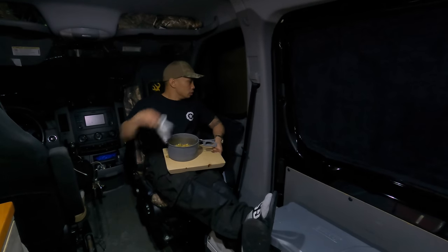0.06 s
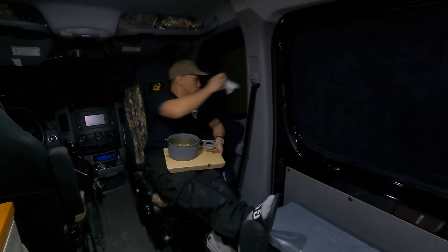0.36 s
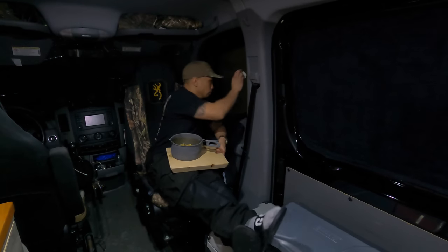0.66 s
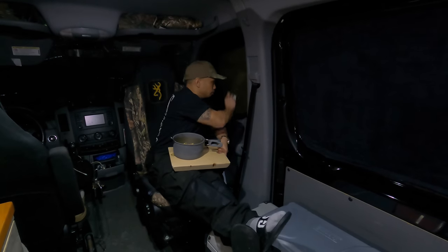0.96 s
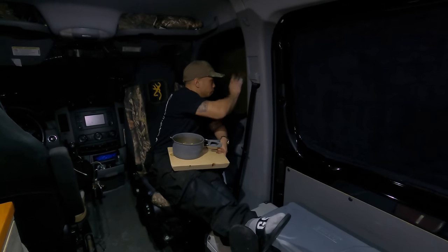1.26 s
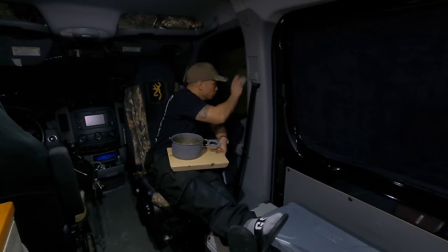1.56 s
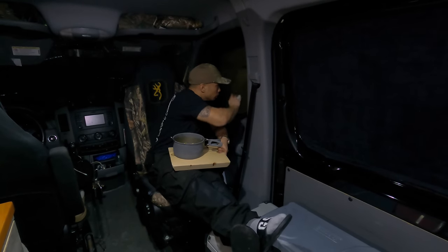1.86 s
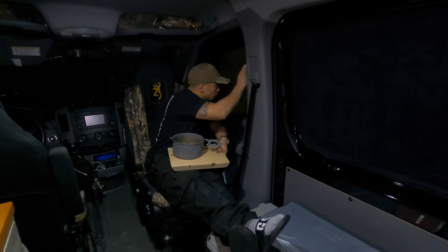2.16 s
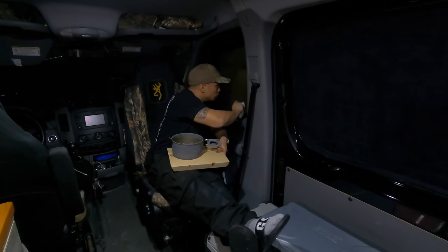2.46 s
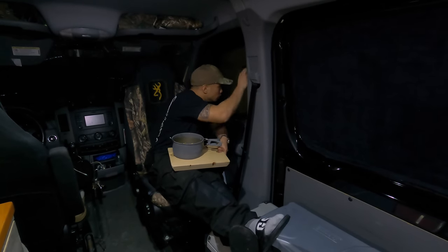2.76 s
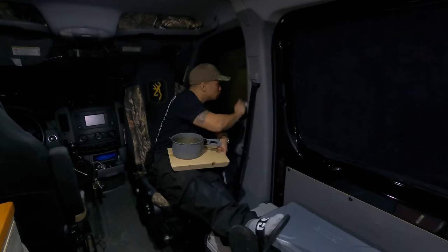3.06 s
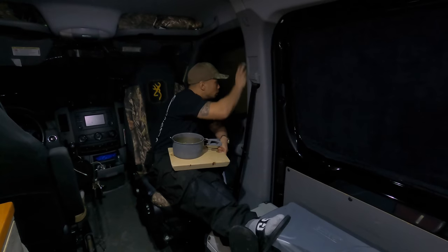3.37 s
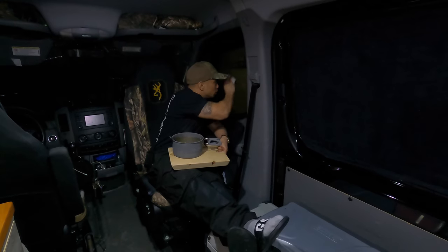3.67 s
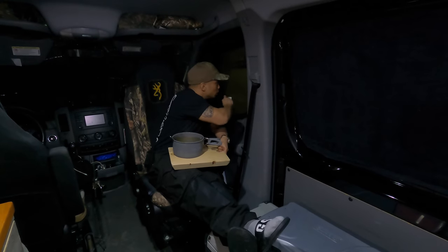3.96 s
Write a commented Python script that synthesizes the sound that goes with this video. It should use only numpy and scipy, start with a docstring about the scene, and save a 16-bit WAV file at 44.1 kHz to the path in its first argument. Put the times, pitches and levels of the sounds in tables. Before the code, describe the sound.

Quiet rubbing of a cloth on window glass follows a short rustle of clothing. The cloth squeaks now and then and the pane thuds lightly in its seal, heard a little way off in a van's low-rumbling cabin.

```python
"""A cloth wipes the side window of a parked van, heard from inside on a stereo pair of microphones.
Its fibres catch and let go in a swish across the pane; now and then it grips the glass and squeaks.
The hand bumps the window, which thuds and rattles in its seal, and rocks the door.
Clothes rustle first, as the arm reaches over, and a low rumble fills the cabin throughout."""
import sys
import numpy as np
from scipy import signal
from scipy.fft import rfft, irfft
from scipy.io import wavfile

SR = 44100
rng = np.random.default_rng(int(sys.argv[2]) if len(sys.argv) > 2 else 0)


def int16_out(signal):
    """Quantize to a 16-bit WAV file."""
    q = np.round(np.clip(np.atleast_2d(signal).T, -1, 1) * 32767)
    wavfile.write(sys.argv[1], SR, q.astype(np.int16))


N = 176400
T = np.arange(N) / SR
HZ = np.maximum(np.arange(N // 2 + 1) * SR / N, 1)
CUTOFF_HZ = 13100


def from_db(db):
    """Decibels to gain."""
    return 10 ** (np.asarray(db) / 20)


def rms_one(x):
    """Scale to rms 1."""
    return x / np.sqrt(np.mean(x ** 2) + 1e-20)


def gain_at(spectrum, hz):
    """Gain from a table of decibels, read on a log-frequency axis."""
    freqs, db = np.transpose(spectrum)
    return from_db(np.interp(np.log(hz), np.log(freqs), db))


def fader(points):
    """Gain over time from a level curve."""
    return from_db(np.interp(T, *np.transpose(points)))


def drift(width_hz, centre_hz=0):
    """Random wavering in a band of frequencies; rms 1."""
    white = rfft(rng.standard_normal(N))
    return rms_one(irfft(white / (1 + ((HZ - centre_hz) / width_hz) ** 2), N))


def swells(rows):
    """Gain over time of bell-shaped movements, each with its own rise and fall."""
    bells = [from_db(db) * np.exp(-((T - peak) / np.where(T < peak, rise, fall)) ** 2)
             for peak, rise, fall, db in rows]
    return np.linalg.norm(bells, axis=0)


def cabin(x, wet_db, t60):
    """Direct sound plus the short, dense reflections of the van's close walls."""
    t = T[:SR // 4]
    tails = rng.standard_normal((2, len(t))) * from_db(-60 * t / t60) * (t > .002)
    tails /= np.sqrt(np.sum(tails ** 2, axis=1, keepdims=True))
    return x + from_db(wet_db) * signal.fftconvolve(x[None], tails, axes=1)[:, :N]


# Base stereo width at the microphones. Each row: frequency in Hz, side minus mid in dB.
STEREO_WIDTH = [(30, -40), (120, -24), (250, -16), (900, -11.5), (2200, -5.5), (4200, -15.5), (7500, -35),
                (9500, -3.5)]
def coloured(source, spectrum, wider_db=0):
    """Two unrelated signals become one stereo sound with the given spectrum; rms 1."""
    low_cut = HZ ** 2 / (HZ ** 2 + 14 ** 2)
    mid, side = rfft(source) * gain_at(spectrum, HZ) * low_cut
    side *= gain_at(STEREO_WIDTH, HZ) * from_db(wider_db)
    return rms_one(irfft(mid + side * [[1], [-1]], N))


def friction(spectrum, flutter_db, flutter_hz):
    """Countless tiny slips of fibres over a smooth hiss, under uneven pressure."""
    slips_per_s, spread_db, slip_share = 5000, 1, .41
    sizes = from_db(spread_db * np.minimum(rng.exponential(1, (2, N)), 4))
    signs = rng.choice([-1, 1], (2, N))
    slips = rms_one(sizes * signs * (rng.random((2, N)) < slips_per_s / SR))
    hiss = rng.standard_normal((2, N))
    rubbing = np.sqrt(slip_share) * slips + np.sqrt(1 - slip_share) * hiss
    pressure = from_db(flutter_db * drift(flutter_hz))
    return coloured(rubbing * pressure, spectrum)


# Room tone, all around the microphones. Each row: frequency in Hz, relative density in dB.
RUMBLE_SPECTRUM = [(18, 4.5), (30, 7.5), (50, -6), (80, -5), (130, -13.5), (200, -17), (300, -28.5),
                   (800, -41), (2000, -47.5), (8000, -55), (14000, -86)]
# Cabin resonances, dead centre. Each row: frequency in Hz, half-width in Hz, level in dB.
CABIN_BOOMS = [(64.6, 4.4, -53), (105.96, 1.34, -62)]
def rumble():
    """Steady low rumble, booming at two resonances of the cabin."""
    bed = from_db(-52.5) * coloured(rng.standard_normal((2, N)), RUMBLE_SPECTRUM, wider_db=11.5)
    return bed + sum(from_db(db) * drift(width, centre_hz=hz) for hz, width, db in CABIN_BOOMS)


# The arm reaching across to the window. Each row: time in seconds, level in dB.
REACH_LEVELS = [(0, -52.5), (.08, -54), (.16, -55), (.22, -61), (.32, -56.5), (.44, -59), (.51, -54.5),
                (.58, -56), (.67, -53), (.79, -59.5), (.87, -66.5), (1.0, -116)]
# Body on seat, hand on pane. Each row: peak time, rise and fall in seconds, level in dB.
SCUFF_SWELLS = [(.388, 0.005, 0.033, -53.5), (.59, 0.075, 0.072, -60.5), (2.474, 0.028, 0.035, -58),
                (3.46, .035, 0.055, -59), (3.607, .005, 0.021, -54)]
# Tone of the rustle and of the scuffs. Each row: frequency in Hz, relative density in dB.
RUSTLE_SPECTRUM = [(230, -6.5), (480, -8.5), (700, -4), (1100, -0.5), (1500, -1.5), (1950, -9.5),
                   (2660, -11.5), (4100, -5.5), (5300, -6.5), (7200, -14.5), (8300, -23), (11000, -38),
                   (13000, -39)]
SCUFF_SPECTRUM = [(330, 13.5), (900, -3.5), (1500, 1), (3000, -47)]
def clothes():
    """Sleeve and back slide over the seat; dull scuffs come from the seat and the hand on the pane."""
    rustle = fader(REACH_LEVELS) * friction(RUSTLE_SPECTRUM, flutter_db=.9, flutter_hz=9.3)
    scuffs = swells(SCUFF_SWELLS) * friction(SCUFF_SPECTRUM, flutter_db=4.5, flutter_hz=135)
    return rustle + scuffs


# Pushes on the door, alike on both microphones.
# Each row: peak time and half-length in seconds, frequency in Hz, level in dB.
DOOR_PUSHES = [(1.536, 0.021, 70.5, -44.5), (1.776, 0.027, 62.3, -47.5), (2.494, 0.026, 63, -43),
               (3.153, 0.027, 27.6, -43.5), (3.67, 0.064, 24, -37), (3.884, 0.0092, 76, -37.5)]
def door():
    """The door panel sways for a few slow cycles when pushed."""
    out = np.zeros(N)
    for peak, half_length, hz, db in DOOR_PUSHES:
        sway = np.sqrt(2) * np.sin(2 * np.pi * hz * (T - peak) + rng.uniform(0, 2 * np.pi))
        out += swells([(peak, half_length, half_length, db)]) * sway
    return out


# The hand on the window. Each row: start in seconds, relative thud and rattle levels in dB.
HAND_BUMPS = [(.378, -63, -50), (0.971, -53.5, -78), (1.004, -47.5, -52), (1.037, -58, -79),
              (1.333, -54, -61), (1.409, -83, -55), (1.749, -49, -72), (1.924, -54.5, -70),
              (1.945, -49, -66), (3.105, -55.5, -57), (3.604, -50, -56), (3.625, -54.5, -51),
              (3.684, -50.5, -52), (3.855, -53.5, -55.5)]
# The window in its frame. Each row: mean frequency in Hz, gain in dB, 60 dB decay time in seconds.
WINDOW_MODES = [(125.7, 5, 0.23), (175.3, -0.5, 0.23), (234.5, 0.5, 0.18), (314.6, -4.5, 0.096),
                (363, -5.5, 0.1), (413, -13, 0.075)]
# The glass shaking in its seal. Each row: frequency in Hz, relative density in dB.
RATTLE_SPECTRUM = [(400, -6), (700, -12.5), (1100, -0.5), (1500, -0.5), (2000, -16.5), (7000, -33),
                   (13000, -75)]
def bumps():
    """Each bump rings the window's low modes and briefly rattles it in its seal."""
    thud_attack_s = .0037  # the cloth cushions the blow
    rattle_attack_s, rattle_t60_s = .0048, .067
    thuds, shake = np.zeros(N), np.zeros(N)
    for start, thud_db, rattle_db in HAND_BUMPS:
        on = (T >= start) & (T < start + .3)
        t = T[on] - start
        for hz, db, t60 in WINDOW_MODES:
            strength = rng.choice([-1, 1]) * from_db(thud_db + db + 2 * rng.normal())
            detuned_hz = hz * (1 + .045 * rng.normal())
            envelope = from_db(-60 * t / t60) * (1 - np.exp(-t / thud_attack_s))
            thuds[on] += strength * envelope * np.sin(2 * np.pi * detuned_hz * t)
        shake[on] += from_db(rattle_db - 60 * t / rattle_t60_s) * (1 - np.exp(-t / rattle_attack_s))
    thuds = cabin(thuds, wet_db=-12.5, t60=.2)
    return thuds + 2 * shake * friction(RATTLE_SPECTRUM, flutter_db=.5, flutter_hz=34)


# The cloth gripping the glass, centred between the microphones. Each row: start and length in
# seconds, first, middle and last pitch in Hz, level in dB, roughness from 0 to 1.
GRIPS = [(1.727, 0.044, 401.3, 391.3, 373, -49, 0.61), (1.727, 0.026, 1590, 1538, 1500, -52.5, 0.26),
         (1.735, .018, 897, 881, 840, -45, 0.13), (2.419, 0.026, 1543, 1436, 1400, -53.5, 0.11),
         (2.426, .033, 513, 487, 432, -53, .04), (2.439, .019, 900, 891, 880, -55, 0.059),
         (3.074, 0.053, 2239, 2094, 2187, -60.5, 0.85), (3.089, 0.016, 3984, 4040, 4140, -60.5, .1),
         (3.701, .054, 2130, 2900, 2950, -59.5, 0.69), (3.795, .072, 2865, 3086, 2910, -61.5, 0.19),
         (3.848, 0.023, 3016, 2820, 2640, -56, 0.44), (3.847, .024, 2230, 1805, 1700, -59, 0.21)]
# How the pane colours a squeak. Each row: frequency in Hz, relative gain in dB.
SQUEAK_RESPONSE = [(380, -18), (490, 11.5), (620, -12), (880, -1), (1180, 0.5), (1500, -0.5), (1900, -28.5),
                   (3000, -28.5), (4500, -36), (11000, -75)]
def squeaks():
    """Stick and slip: a harmonic tone, part clean and part rasp, arcs in pitch."""
    attack, release = .33, .4  # shares of a squeak's length
    jitter, rasp_hz = .04, 330  # pitch spread at full roughness; noise width around each partial
    out = np.zeros(N)
    wobble = drift(380)
    rasps = [(drift(rasp_hz) + 1j * drift(rasp_hz)) / np.sqrt(2) for _ in range(7)]
    for start, length, first, middle, last, db, rough in GRIPS:
        on = (T >= start) & (T < start + length)
        progress = (T[on] - start) / length
        arc = np.polyfit([0, .5, 1], [first, middle, last], 2)
        hz = np.polyval(arc, progress) * (1 + jitter * rough * wobble[on])
        phase = 2 * np.pi * np.cumsum(hz) / SR
        tone = np.zeros(len(hz))
        for k, rasp in enumerate(rasps, 1):
            partial = np.exp(1j * (k * phase + rng.uniform(0, 2 * np.pi)))
            grain = np.sqrt(1 - rough) + np.sqrt(rough) * rasp[on]
            if k * middle < CUTOFF_HZ:
                tone += gain_at(SQUEAK_RESPONSE, k * hz) * (grain * partial).real
        envelope = np.clip(np.minimum(progress / attack, (1 - progress) / release), 0, 1)
        out[on] += from_db(db) * envelope * rms_one(tone)
    return cabin(out, wet_db=-8, t60=.11)


# Resonances of the side window. Each entry: frequency in Hz.
GLASS_PEAKS_HZ = [1455, 3970, 4190, 4740, 5320]
def pane(x):
    """The glass rings a little under the cloth, lifting a few narrow bands."""
    half_width_hz, lift_db = 16.3, 5.5
    peaks = sum(1 / (1 + ((HZ - hz) / half_width_hz) ** 2) for hz in GLASS_PEAKS_HZ)
    return irfft(rfft(x) * from_db(lift_db * peaks), N)


# Light rubbing on the glass, an arm's reach from the seat. Each row: time in seconds, level in dB.
GLIDE_LEVELS = [(.7, -67), (.85, -66.5), (1.17, -65.5), (1.3, -72), (1.39, -67.5), (1.54, -73),
                (1.68, -67.5), (1.9, -69), (2.25, -73), (2.35, -69.5), (2.6, -72.5), (2.95, -67.5),
                (3.25, -71.5), (3.58, -65.5), (3.8, -70.5), (4, -74.5)]
# Quick strokes and pressed drags. Each row: peak time, rise and fall in seconds, level in dB.
STROKE_SWELLS = [(.952, 0.031, 0.029, -56), (1.465, 0.024, 0.035, -62.5), (2.092, 0.038, 0.034, -59.5),
                 (2.16, 0.031, 0.044, -62.5), (2.737, 0.054, 0.034, -59.5), (2.862, 0.034, 0.052, -62),
                 (3.105, 0.04, 0.022, -66), (3.165, 0.022, 0.031, -64.5), (3.48, 0.06, 0.045, -56.5),
                 (3.634, 0.028, 0.025, -56), (3.863, 0.015, 0.034, -57.5)]
DRAG_SWELLS = [(.93, 0.088, 0.067, -71.5), (1.64, 0.026, 0.011, -68), (1.99, 0.09, 0.051, -68)]
# Tone of each movement from inside the van. Each row: frequency in Hz, relative density in dB.
GLIDE_SPECTRUM = [(500, -19), (900, -11.5), (1200, 1.5), (1500, 0.5), (1900, -8.5), (2600, -12.5),
                  (4000, -7), (5500, -4), (7400, -10.5), (8300, -21), (10500, -34), (12500, -46)]
STROKE_SPECTRUM = [(300, -11.5), (450, -22.5), (650, -21.5), (850, -22), (1150, -1.5), (1500, -1.5),
                   (1900, -8.5), (2600, -12), (3900, -6), (5300, -6.5), (7400, -14), (8300, -25),
                   (10800, -38), (12500, -44)]
DRAG_SPECTRUM = [(700, -37.5), (1150, -9), (1530, 6), (1900, -15), (2600, -50)]
def wiping():
    """The cloth glides, swishes on each quick stroke and sets the pane humming when pressed."""
    glide = fader(GLIDE_LEVELS) * friction(GLIDE_SPECTRUM, flutter_db=1.5, flutter_hz=16)
    strokes = swells(STROKE_SWELLS) * friction(STROKE_SPECTRUM, flutter_db=.7, flutter_hz=36)
    drags = swells(DRAG_SWELLS) * friction(DRAG_SPECTRUM, flutter_db=1.5, flutter_hz=140)
    return pane(glide + strokes + drags)


def scene():
    """Everything heard inside the van, from the room tone up to the cloth."""
    return rumble() + clothes() + door() + bumps() + squeaks() + wiping()


# Balance of the microphone pair. Each row: frequency in Hz, left minus right in dB.
MIC_BALANCE = [(60, 0.6), (250, -1.8), (600, -2), (1400, 2), (2600, 0.4), (5000, -1), (7000, 3.5),
               (9000, 10.5)]
def record(dry):
    """The two microphones in the cabin differ in colour; the top treble is cut steeply."""
    tilt = gain_at(MIC_BALANCE, HZ) ** np.array([[.5], [-.5]])  # half to each side
    heard = irfft(rfft(dry) * tilt, N)
    low_pass = signal.ellip(10, .1, 70, CUTOFF_HZ, fs=SR, output="sos")
    return signal.sosfilt(low_pass, heard)


dry = scene()
out = record(dry)
int16_out(out)
```